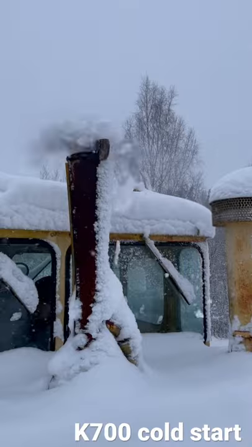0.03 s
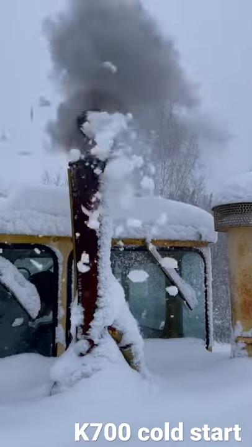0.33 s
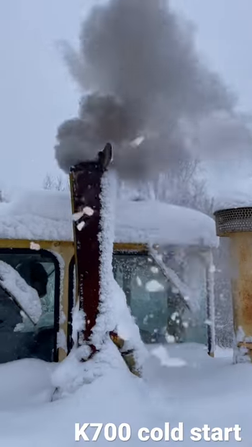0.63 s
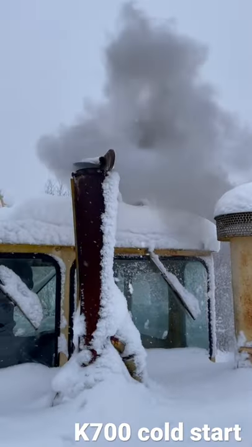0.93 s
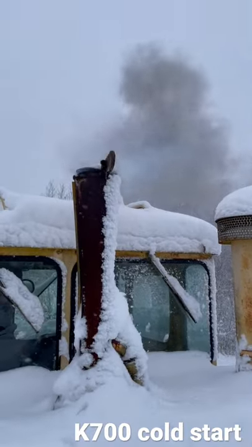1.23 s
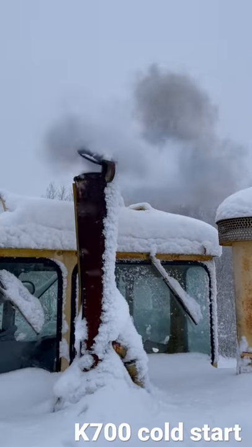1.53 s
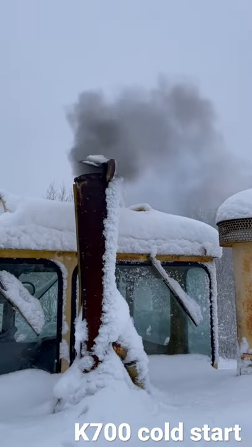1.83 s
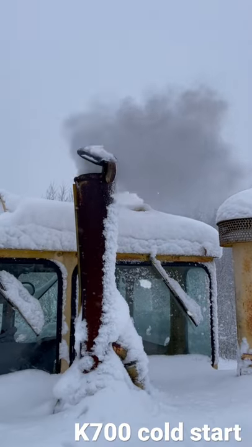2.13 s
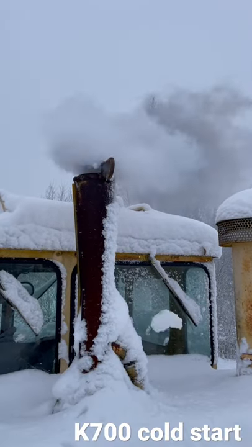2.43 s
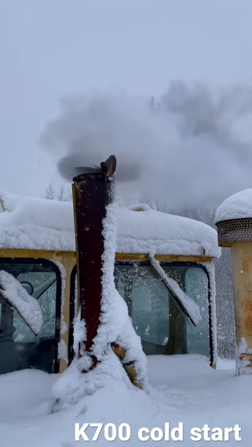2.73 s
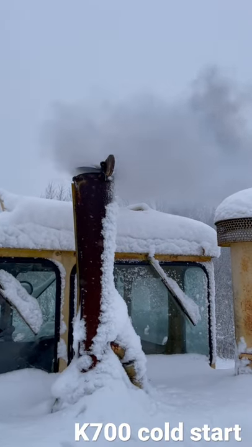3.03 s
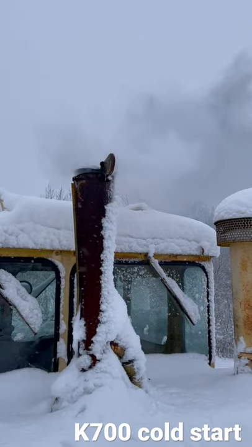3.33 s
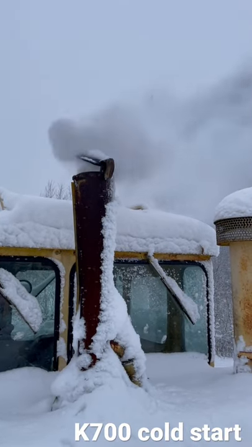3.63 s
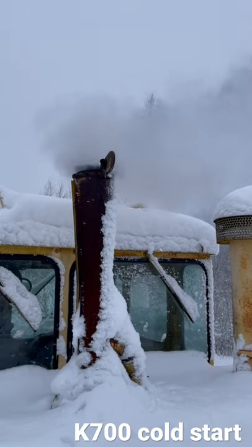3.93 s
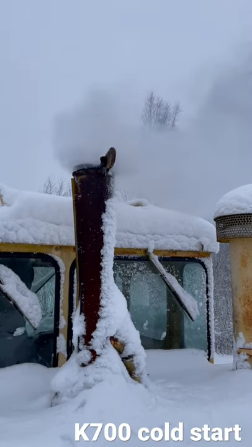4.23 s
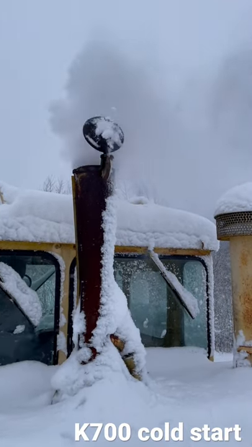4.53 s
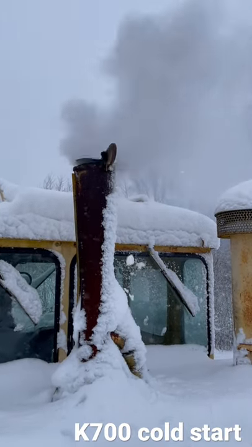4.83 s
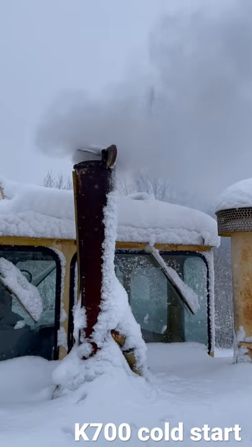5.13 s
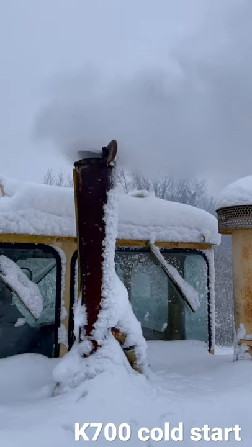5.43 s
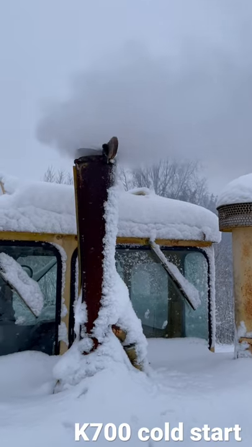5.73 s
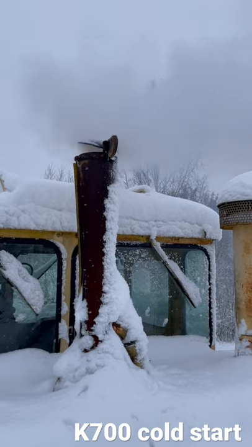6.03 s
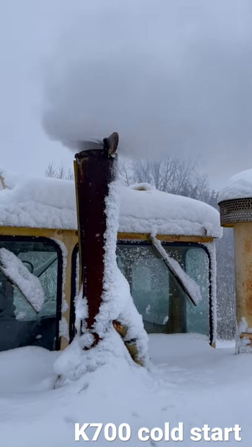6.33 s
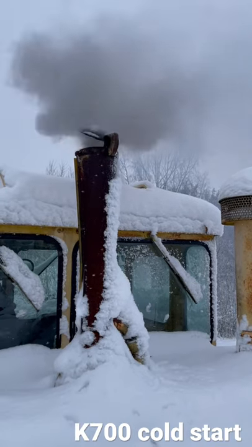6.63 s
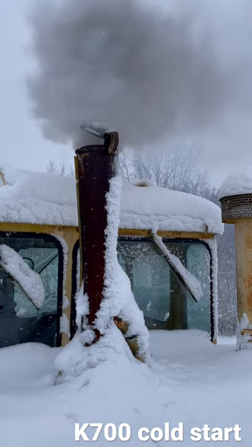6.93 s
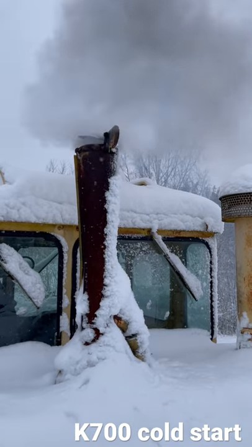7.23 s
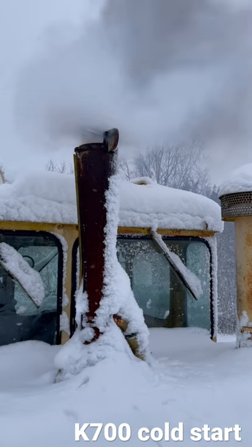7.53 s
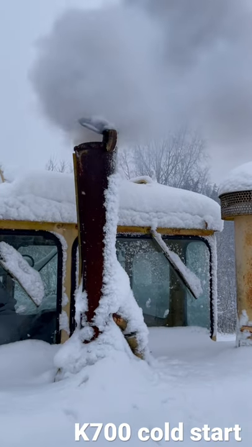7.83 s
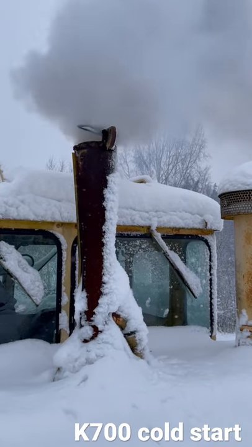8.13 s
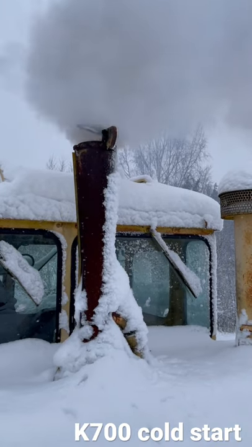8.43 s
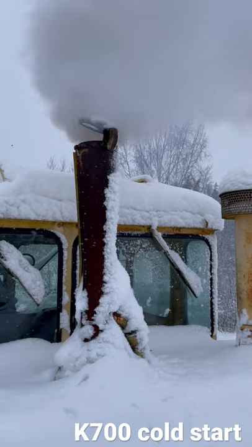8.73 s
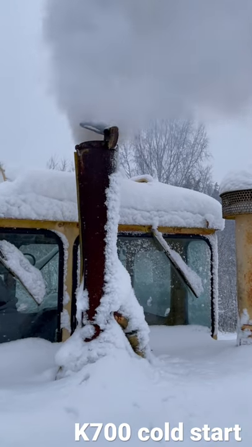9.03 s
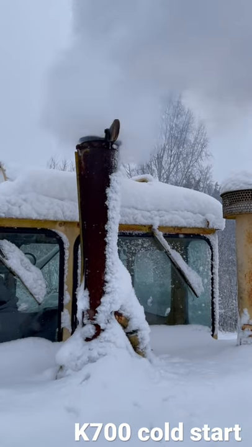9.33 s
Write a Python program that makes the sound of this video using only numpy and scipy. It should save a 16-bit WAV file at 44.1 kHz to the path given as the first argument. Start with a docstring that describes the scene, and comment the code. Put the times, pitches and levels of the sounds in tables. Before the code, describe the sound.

Ragged barks from a tractor's exhaust stack rattle its rain cap, until the cold diesel catches and speeds up, turbo whining.

```python
"""Stumbling booms and barks from an upright exhaust stack, close by: a big turbo diesel tractor starts cold.
Only some cylinders catch. Each firing booms in the stack, barks in its upper resonances and spits gas,
in ragged groups that settle into a fast lope. The turbo, pushed by every puff, whines up over the
engine's clatter. The steel rain cap rattles on top, and a limiter holds down the loudest chugs."""
import sys
import numpy as np
from scipy import signal
from scipy.fft import rfft, irfft
from scipy.io import wavfile
from scipy.ndimage import uniform_filter1d

SR = 44100
rng = np.random.default_rng(int(sys.argv[2]) if len(sys.argv) > 2 else 0)


def log_audio(samples):
    """Write samples as a 16-bit WAV file to the path given in sys.argv[1]."""
    # one column per channel
    frames = np.atleast_2d(samples).T
    # limit to full scale, then quantise
    limited = np.clip(frames, -1, 1)
    pcm = np.round(limited * 32767).astype(np.int16)
    wavfile.write(sys.argv[1], SR, pcm)


N = 413216
TIME = np.arange(N) / SR
CYLINDERS = 8

# The running engine, one chug per cycle of all cylinders.
# Each row: start in seconds, then hiss and bark in dB relative to the lope.
CHUGS = [(4.552, -4, -0.5), (4.779, -1, -2), (5.015, -0.5, -1), (5.245, 0, -0.5), (5.469, 1.5, 0.5),
         (5.676, -2, -3), (5.888, 1, 1), (6.095, 3, 1.5), (6.292, 4.5, 2), (6.467, 2, 3), (6.618, 3, 0),
         (6.756, 1, -1), (6.901, -1.5, -2), (7.039, -4, -5.5), (7.181, -3, -5), (7.329, -0.5, -1),
         (7.483, 3.5, 1), (7.637, 0.5, 2), (7.783, -0.5, 0.5), (7.924, 0, 0.5), (8.062, -0.5, 0),
         (8.194, 0.5, -5), (8.332, 1.5, -0.5), (8.472, 1, -2.5), (8.605, 0.5, 0), (8.735, 1.5, 1),
         (8.861, -3, -2.5), (8.978, -14, -16.5)]
# The ring of the rain cap. Each row: pitch in Hz, level in dB, seconds to fade by 60 dB.
CAP_MODES = [(645, -17, .04), (1270, -10, .06), (1622, -5.5, 0.13), (1830, -8, 0.094), (2000, -12, 0.087),
             (2610, -3.5, 0.12), (2820, -8.5, 0.14), (4280, -6.5, 0.024), (4500, -8, .04), (5750, -22, .06)]


def undb(db):
    """Decibels to gain."""
    return 10 ** (np.asarray(db) / 20)


def unit(x):
    """Scale to rms 1."""
    return x / np.sqrt(np.mean(x ** 2))


def curves(table):
    """Turn rows that begin with a time into one control curve per remaining column."""
    s, *columns = np.transpose(table)
    return [np.interp(TIME, s, c) for c in columns]


def gains(points, hz):
    """Gain of a spectrum at the given frequencies."""
    f, db = np.transpose(points)
    return undb(np.interp(np.log(hz + 1), np.log(f), db))


def colour(x, points):
    """Filter by a spectrum that falls away steeply beyond its ends; rms 1."""
    hz = np.fft.rfftfreq(N, 1 / SR)
    ends = np.minimum(hz / points[0][0], 1) ** 2 * np.minimum(points[-1][0] / (hz + 1), 1) ** 2
    return unit(irfft(rfft(x) * gains(points, hz) * ends, N))


def walk(hz):
    """A smooth random wander with rms 1."""
    k = max(int(SR / hz), 2)
    steps = np.repeat(rng.standard_normal(N // k + 1), k)
    return unit(uniform_filter1d(steps, k)[:N])


def swell(age, rise):
    """An envelope that peaks at 1 after its rise time and dies away."""
    return age / rise * np.exp(1 - age / rise)


def add(track, s, sound):
    """Mix a sound into a track at a time."""
    start = max(int(s * SR), 0)
    track[start:start + len(sound)] += sound[:N - start]


def puffs(times, dbs, attack_s, hold_s, release_s):
    """Each puff builds as the valve opens, holds while the cylinder empties and is shut off."""
    power, age = np.zeros(N), TIME[:SR // 5]
    shape = (1 - np.exp(-age / attack_s)) / np.hypot(1, np.exp((age - hold_s) / release_s))
    for s, db in zip(times, dbs):
        add(power, s, (undb(db) * shape) ** 2)
    return np.sqrt(power)


def jet(flow, spectrum, rough_db, rough_hz, vary_db):
    """Turbulent gas tears in quick eddies; no two puffs are alike."""
    eddies = undb(rough_db * walk(rough_hz) + vary_db * walk(45))
    return flow * colour(rng.standard_normal(N) * eddies, spectrum)


def crank(coast_hz_per_s=70):
    """The crank stumbles, runs, then coasts: its stroke rate, and strokes counted from the first chug."""
    # The stumbling crank. Each row: time in seconds, strokes per second.
    stumble_speed = [(0, 37.8), (.28, 44.9), (.42, 60.25), (.9, 31.2), (1.3, 25.17), (1.45, 36.9),
                     (1.7, 41.67), (2, 26.11), (2.3, 27.05), (2.55, 43.9), (3.2, 24.95), (3.42, 38.1),
                     (3.8, 34.92), (4.2, 27.1), (4.5, 36.9)]
    starts = np.transpose(CHUGS)[0]
    cycle = np.clip(np.searchsorted(starts, TIME) - 1, 0, len(starts) - 2)
    running = CYLINDERS / np.diff(starts)[cycle] - coast_hz_per_s * np.maximum(TIME - starts[-1], 0)
    hz = np.where(TIME < starts[0], curves(stumble_speed)[0], np.maximum(running, 1))
    strokes = np.cumsum(hz) / SR
    return hz, strokes - np.interp(starts[0], TIME, strokes)


def firings(strokes, gaining_s=(6.29, 6.55), fast_s=(7.33, 7.56), boom_share=0.26, scatter_db=1.0):
    """Time, hiss, bark and boom of each firing: ragged runs, then a lope that shifts as it warms."""
    # Runs on successive strokes. Each row: start in seconds, firing count, then hiss, bark, boom in dB.
    stumbles = [(.034, 1, -27, -14.5, -7), (.075, 3, -18, -9.5, -8), (.175, 3, -24.5, -11.5, -16),
                (.262, 2, -19.5, -9, -6), (0.335, 3, -24.5, -14.5, -11.5), (0.548, 4, -41.5, -28, -14.5),
                (.685, 1, -27.5, -17.5, -21), (0.942, 1, -26.5, -24.5, -16), (1.118, 1, -38, -31, -20),
                (1.323, 1, -21.5, -18.5, -10.5), (1.41, 2, -16.5, -12.5, -11),
                (1.466, 3, -24.5, -14.5, -17), (1.564, 1, -26, -13, -10), (1.613, 2, -26, -16.5, -14),
                (1.756, 1, -29.5, -22, -8), (1.954, 2, -24.5, -21.5, -15.5), (2.11, 1, -38, -38, -9.5),
                (2.312, 6, -21.5, -14, -13.5), (2.536, 1, -19.5, -17, -8), (2.614, 2, -22.5, -20, -9),
                (2.743, 1, -24.5, -16.5, -9), (2.828, 1, -21, -20, -8.5), (2.979, 1, -22.5, -19, -11.5),
                (3.088, 1, -39, -35, -20), (3.287, 2, -24, -17.5, -17.5), (3.359, 3, -22.5, -16.5, -12),
                (3.531, 1, -20, -13.5, -7.5), (3.586, 2, -23.5, -19.5, -8.5), (3.764, 2, -22.5, -16, -10.5),
                (3.853, 1, -28, -26, -12.5), (4.023, 1, -23, -15.5, -13), (4.126, 1, -26, -20.5, -15),
                (4.161, 1, -40, -33, -7), (4.317, 5, -22, -13, -12)]
    # Three lopes. Each row: a firing's place in the cycle in strokes, then hiss, bark, boom in dB.
    lope_cold = [(0, -21.5, -14.5, -8.5), (1, -37, -25.5, -25.5), (2.1, -21, -18, -11),
                 (3.1, -19, -14, -12), (4, -27.5, -18, -11.5)]
    lope_gaining = [(0, -28, -21.5, -13), (1, -58.5, -34, -28), (2.15, -25.5, -20, -16),
                    (3.2, -23, -16.5, -8.5), (4.25, -30.5, -29, -34)]
    lope_fast = [(0, -28.5, -15, -20), (1, -20.5, -17, -16.5), (1.95, -34.5, -19.5, -17.5),
                 (2.85, -26.5, -24, -9), (3.9, -50, -35, -26.5)]
    rows = []
    for s, count, *dbs in stumbles:
        rows += [(np.interp(s, TIME, strokes) + k, *dbs) for k in range(round(count))]
    cold, gaining, fast = np.array([lope_cold, lope_gaining, lope_fast])
    for k, (s, hiss_db, bark_db) in enumerate(CHUGS):
        lope = cold + np.interp(s, gaining_s, [0, 1]) * (gaining - cold)
        lope += np.interp(s, fast_s, [0, 1]) * (fast - gaining)
        rows += list(lope + [k * CYLINDERS, hiss_db, bark_db, boom_share * bark_db])
    place, *dbs = np.transpose(rows)
    return np.interp(place, strokes, TIME), *(dbs + scatter_db * rng.standard_normal(len(rows)))


def pumping(stroke_hz, strokes, full_db=-19.5, full_hz=37.8, db_per_octave=13, uneven_db=5.5):
    """Every cylinder, lit or not, pumps air; the stack favours harmonics near its lowest resonance."""
    # The throb of pumped air. Each row: frequency in Hz, level in dB.
    spectrum = [(25, -17), (45, -2), (62, -2), (85, -7.5), (115, -10), (170, -27), (260, -35)]
    turn = strokes - 0.465 + 0.055 * walk(25)  # lags the stroke and wavers
    throb = sum(gains(spectrum, k * stroke_hz) * undb(uneven_db * walk(30))
                * np.sin(2 * np.pi * k * turn) for k in range(1, 5))
    return unit(throb) * undb(full_db + db_per_octave * np.minimum(np.log2(stroke_hz / full_hz), 0))


def clatter(strokes, decay_strokes=0.19):
    """Valve gear and pistons knock once a stroke over a steady churn."""
    # The tone of the knocks. Each row: frequency in Hz, level in dB.
    spectrum = [(110, 13.5), (200, 3.5), (300, -0.5), (470, -6.5), (600, -5.5), (700, -13), (850, -7),
                (1250, -15.5), (2500, -20.5), (4700, -35), (5500, -33), (6300, -31), (10500, -26.5),
                (12500, -52)]
    knocks = (1 + np.exp(-(strokes % 1) / decay_strokes)) * undb(2.03 * walk(50))
    return colour(knocks * rng.standard_normal(N), spectrum)


def wheeze(clatter_db, relative_db=-18, warm_s=4.3, warm_db=-7):
    """Cold cylinders that fail to light leak uneven spits of air, softer once the engine catches."""
    # The thin leak. Each row: frequency in Hz, level in dB.
    spectrum = [(1300, 17), (2500, -8), (3500, 2.5), (4800, 2), (5500, 7), (6300, -10), (10500, -4.5),
                (12000, -29)]
    fade_db = np.interp(TIME, [warm_s, warm_s + 1], [0, warm_db])
    leak = undb(clatter_db + relative_db + fade_db)
    return jet(leak, spectrum, rough_db=4.5, rough_hz=400, vary_db=5.5)


def rattle(times, hiss_db, relative_db=-8, vary_db=7, detune=0.048, t60_share=0.49, attack_s=0.0092):
    """Every firing shakes the loose steel atop the stack: a brief ring, never quite the same."""
    out, age = np.zeros(N), TIME[:SR // 12]
    hz, db, t60 = np.transpose(CAP_MODES)[:, :, None]
    chances = rng.standard_normal((len(times), 2, len(CAP_MODES), 1))
    for s, blow_db, (size, shift) in zip(times, hiss_db, chances):
        decay = undb(db + vary_db * size - 60 * age / (t60 * t60_share))
        modes = decay * np.sin(2 * np.pi * hz * (1 + detune * shift) * age)
        add(out, s, undb(blow_db + relative_db) * modes.sum(0) * np.minimum(age / attack_s, 1))
    return out


def rain_cap(slap_s=0.0088, attack_s=0.0012):
    """The lid slaps shut or chatters on its hinge: a short scrape of steel on steel, and a ring."""
    # Hits of the lid. Each row: start in seconds, ring in dB, slap in dB.
    clacks = [(.035, -26, -16.5), (.687, -34, -12), (1.569, -29, -15.5), (2.476, -32, -36),
              (4.326, -23, -32), (4.44, -21, -34), (4.495, -25, -11.5), (4.559, -19.5, -29),
              (4.644, -23.5, -39), (5.249, -22, -36), (5.339, -18, -39)]
    # The tone of the slap. Each row: frequency in Hz, level in dB.
    spectrum = [(400, 16), (1500, 7), (3000, -4), (4200, 2), (6000, -5), (11000, -11)]
    out, age = np.zeros(N), TIME[:SR // 5]
    scrape = colour(rng.standard_normal(N), spectrum)
    for s, ring_db, slap_db in clacks:
        ring = sum(undb(ring_db + db - 60 * age / t60) * np.sin(2 * np.pi * (hz * age + rng.random()))
                   for hz, db, t60 in CAP_MODES)
        slap = undb(slap_db) * scrape[int(s * SR):][:len(age)] * np.exp(-age / slap_s)
        add(out, s, (ring + slap) * np.minimum(age / attack_s, 1))
    return out


def turbo(flow, strokes, kick=0.04035, flutter_hz=72, coast=0.13, trim_db=3, full_flow_db=-26):
    """Each puff blows the whine louder, rougher and a little higher; between puffs it coasts."""
    # A brief spin, then the spool-up. Each row: time in seconds, base pitch in Hz, base level in dB.
    spool = [(.3, 520, -71), (.43, 465, -10.5), (.68, 298.8, -29), (.9, 230.8, -40.5), (5.9, 298.6, -41),
             (6.2, 402, -22.5), (6.38, 537.4, -25), (6.6, 725, -26.5), (6.95, 1065, -24.5),
             (7.38, 1195, -24), (7.53, 1320, -19.5), (7.96, 1658, -19.5), (8.12, 1754, -27.5),
             (8.37, 1957, -28), (8.63, 2184, -32.5), (8.87, 2530, -24.5), (9.1, 2426, -16),
             (9.37, 2285, -32)]
    hz, db = curves(spool)
    push = np.tanh(flow / undb(full_flow_db))
    spin = uniform_filter1d(push, SR // 25, origin=SR // 60)
    flutter = flutter_hz * (0.2945 + push) * (walk(600) + 0.7 * walk(90))
    hz = hz * (1 + kick * (spin - .5)) + flutter
    whine = np.sin(2 * np.pi * np.cumsum(hz) / SR) * undb(3.5 * walk(260))
    chop = 1 - 0.34 * np.cos(2 * np.pi * strokes)
    return unit(whine * chop) * (coast + push) * undb(db + trim_db)


def gulps(glide_s=0.0049):
    """Slugs of gas hoot briefly in the stack, sliding in pitch."""
    # Hollow hoots. Each row: start in seconds, first and last pitch in Hz, rise in seconds, level in dB.
    hoots = [(.352, 530, 486, 0.0099, -6), (1.463, 491.4, 467, 0.0038, -5.5),
             (1.491, 543, 599, 0.0057, -6.5), (2.342, 510, 540, 0.0022, -12),
             (2.431, 532, 576, 0.0047, -5.5), (2.459, 605, 587, 0.004, -10.5),
             (3.405, 600, 586, 0.0054, -7), (3.985, 183, 235, 0.01, -18),
             (4.198, 169.2, 250.4, 0.0079, -17.5), (4.272, 1000, 150, 0.0084, -8.5),
             (4.433, 506, 440, .005, -20), (5.355, 487.5, 447, 0.0041, -7), (6.376, 540, 597, 0.0063, -4)]
    out, age = np.zeros(N), TIME[:SR // 5]
    for s, start_hz, end_hz, rise, db in hoots:
        hz = end_hz + (start_hz - end_hz) * np.exp(-age / glide_s)
        add(out, s, undb(db) * swell(age, rise) * np.sin(2 * np.pi * np.cumsum(hz) / SR))
    return out


def pipe(x):
    """The steel pipe rings on at its resonances; the overall level stays the same."""
    # Sharp upper resonances. Each row: frequency in Hz, width in Hz, strength in dB.
    modes = [(420, 5.6, 4), (467.3, 9.2, 8.5), (552.5, 32, -7), (623, 40, 3), (758, 20.6, 4.5),
             (1007, 19, -2), (1367, 130, -14), (1636, 11, 6.5), (1800, 17, -34), (1978, 22, 4.5),
             (2440, 10, 7), (2780, 12, 6.5), (3060, 17, 4)]
    f = np.fft.rfftfreq(N, 1 / SR)
    ringing = sum(undb(db) * 1j * f * width / (hz ** 2 - f ** 2 + 1j * f * width)
                  for hz, width, db in modes)
    return unit(irfft(rfft(x) * (1 + ringing), N)) * np.std(x)


def exhaust(flow, blast, strokes):
    """Puffs of gas bark, hiss and sizzle out through the pipe, along with the clatter and wheeze."""
    # Low, middle and high bands of the gas noise. Each row: frequency in Hz, level in dB.
    bark_spectrum = [(90, 0.5), (140, 9.5), (200, -13), (245, 0.5), (350, -4.5), (520, 1), (620, -2.5),
                     (690, -18.5), (830, -3.5), (1150, -14), (1550, -10.5), (2400, -65)]
    hiss_spectrum = [(500, -17), (1000, 0.5), (1550, 1), (2100, -4), (2650, -3), (3200, -4.5), (3700, -7.5),
                     (4300, -16.5), (6000, -21)]
    sizzle_spectrum = [(3000, -19), (4300, -1.5), (5300, -0.5), (7000, 5), (9000, 0), (10600, 7.5),
                       (11500, -6.5), (12600, -40)]
    # The rise and fall of the clatter. Each row: time in seconds, level in dB.
    clatter_level = [(0, -30), (.6, -22.5), (1.05, -27), (1.25, -31), (1.5, -22), (1.9, -26.5),
                     (2.7, -24.5), (3.6, -26), (4.3, -24), (7.3, -25), (8.85, -20.5), (9.1, -25),
                     (9.37, -29)]
    clatter_db, = curves(clatter_level)
    bark = jet(blast, bark_spectrum, rough_db=2.5, rough_hz=300, vary_db=1)
    hiss = undb(-2.5) * jet(flow, hiss_spectrum, rough_db=0, rough_hz=370, vary_db=2)
    sizzle = undb(-1) * jet(flow, sizzle_spectrum, rough_db=1.5, rough_hz=900, vary_db=2.5)
    return pipe(bark + hiss + sizzle + undb(clatter_db) * clatter(strokes) + wheeze(clatter_db))


def boom(times, dbs, detune=0.029):
    """Each firing rings the gas column of the stack, slightly differently as its heat varies."""
    # Low resonances of the stack. Each row: pitch in Hz, rise in seconds, level in dB.
    modes = [(63.6, 0.023, -2), (107.8, 0.011, -5.5), (134.2, 0.016, -16)]
    out, age = np.zeros(N), TIME[:SR // 5]
    for s, db, shifts in zip(times, dbs, rng.standard_normal((len(times), len(modes)))):
        for (hz, rise, mode_db), shift in zip(modes, shifts):
            tone = -np.sqrt(2) * np.sin(2 * np.pi * hz * (1 + detune * shift) * age)
            add(out, s, undb(db + mode_db) * swell(age, rise) * tone)
    return out


def ports(near, plume):
    """Two microphone ports hear the stack with their own colour and delay; the plume adds width."""
    # Stereo balance. Each row: frequency in Hz, left minus right in dB.
    balance = [(190, -1), (350, -0.5), (520, 4.5), (750, 7), (1150, 6.5), (2000, -1.5), (6700, 0.5)]
    # Stereo phase. Each row: frequency in Hz, lead of the left port in radians.
    phase = [(150, 0), (430, .6), (900, .5), (1050, -.8), (1300, -.3), (2100, .2), (2400, -.4), (2700, .7),
             (4300, .5), (4700, -3), (5700, 0), (8400, 3), (9600, 3.3), (12200, 6.4)]
    hz = np.fft.rfftfreq(N, 1 / SR)
    lead = np.interp(hz, *np.transpose(phase))
    tilt = gains(balance, hz)
    response = np.array([tilt, np.exp(-1j * lead)]) * np.sqrt(2 / (1 + tilt ** 2))
    return irfft(rfft(np.array([near + plume, near - plume])) * response, N)


def scene(plume_db=-14):
    """The firings drive boom, bark, hiss and turbo together, over the turning engine."""
    stroke_hz, strokes = crank()
    times, hiss_db, bark_db, boom_db = firings(strokes)
    flow = puffs(times, hiss_db, attack_s=0.00401, hold_s=.02, release_s=.009)
    blast = puffs(times, bark_db, attack_s=0.0033, hold_s=.022, release_s=0.00993)
    lows = boom(times, boom_db) + pumping(stroke_hz, strokes) + gulps()
    rush = exhaust(flow, blast, strokes)
    whine = turbo(flow + 0.15 * blast, strokes)
    steel = rain_cap() + rattle(times, hiss_db)
    plume = undb(plume_db) * exhaust(flow, blast, strokes)
    gate = np.clip((TIME - times[0]) * SR / 100, 0, 1)  # silence before the first firing, then a fade-in over about 2 ms
    return ports(lows + rush + whine + steel, plume) * gate


def record(dry, limit_db=-6.5, window_s=0.018, gain_db=0.3, top_hz=12700):
    """A limiter holds down the loudest chugs; the peaks are rounded and the top treble is cut."""
    power = uniform_filter1d(np.mean(dry ** 2, axis=0), int(window_s * SR))
    held = dry * undb(gain_db) / (1 + (power / undb(limit_db) ** 2) ** 2) ** (1 / 4)
    rounded = held / (1 + held ** 6) ** (1 / 6)
    return signal.sosfilt(signal.ellip(8, .2, 80, top_hz, fs=SR, output="sos"), rounded)


dry = scene()
out = record(dry)
log_audio(out)
```